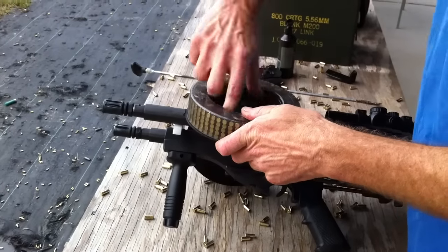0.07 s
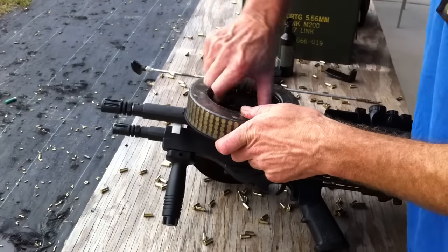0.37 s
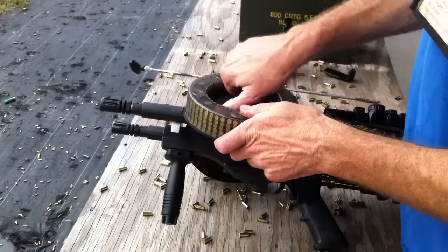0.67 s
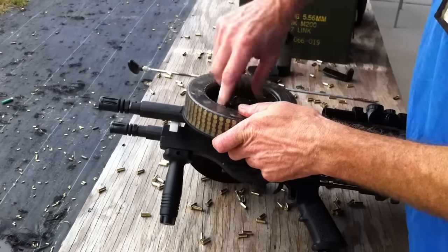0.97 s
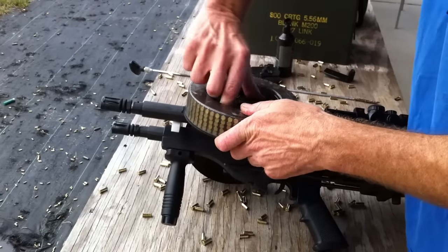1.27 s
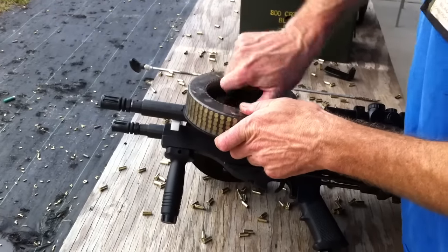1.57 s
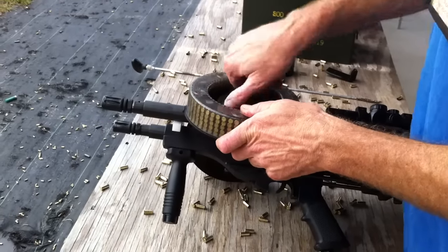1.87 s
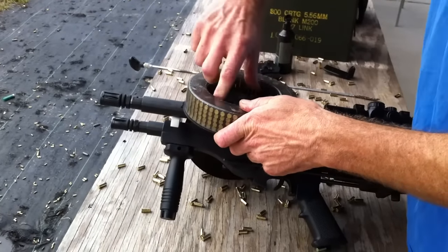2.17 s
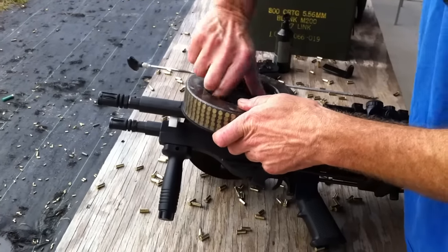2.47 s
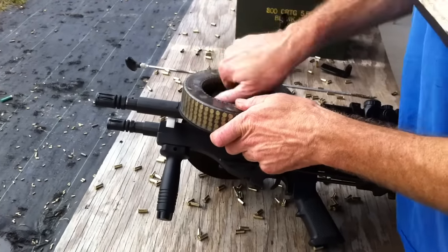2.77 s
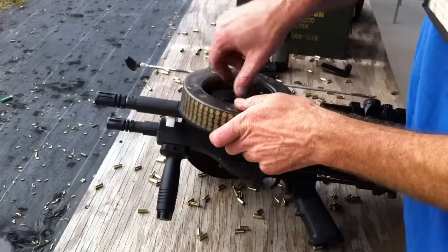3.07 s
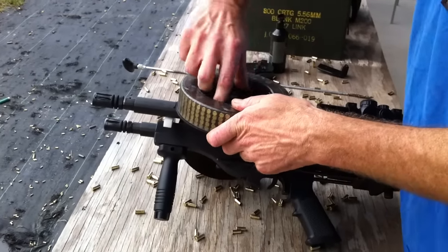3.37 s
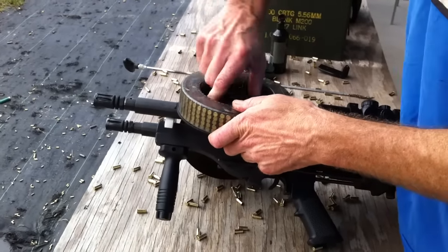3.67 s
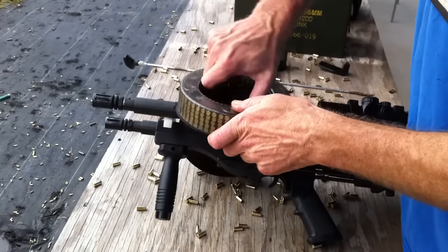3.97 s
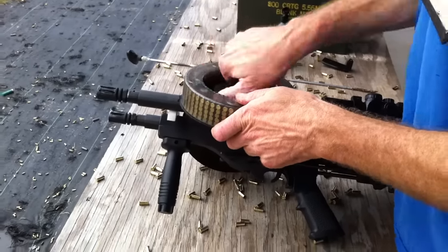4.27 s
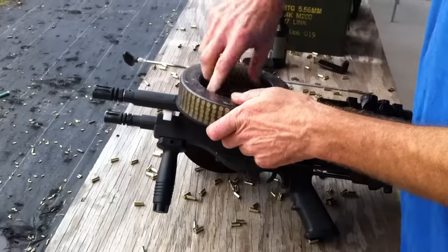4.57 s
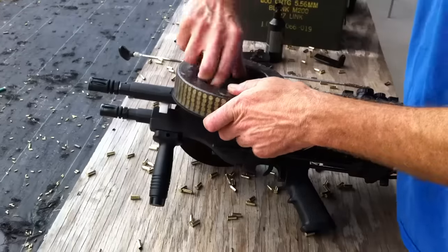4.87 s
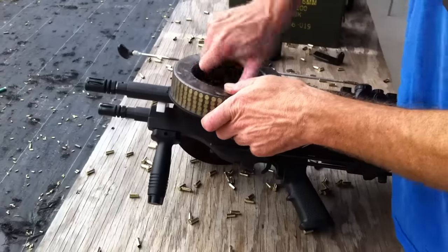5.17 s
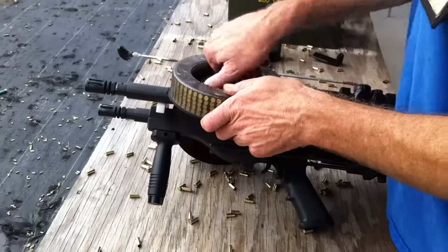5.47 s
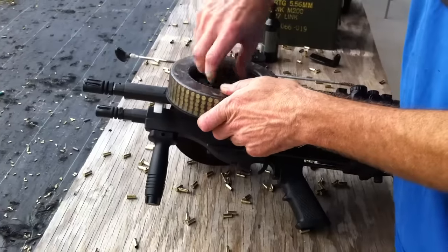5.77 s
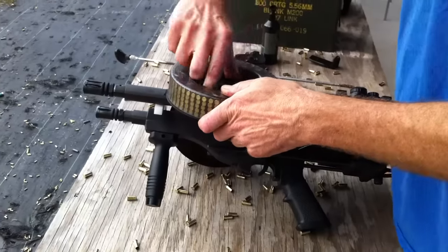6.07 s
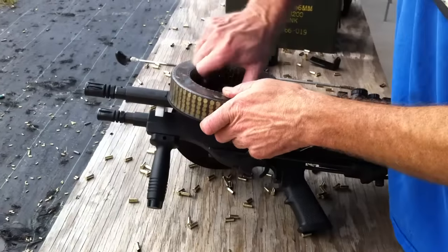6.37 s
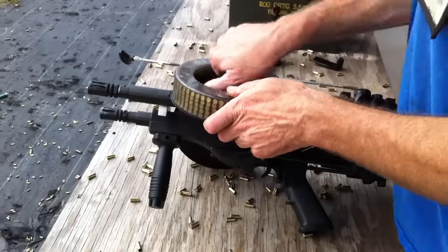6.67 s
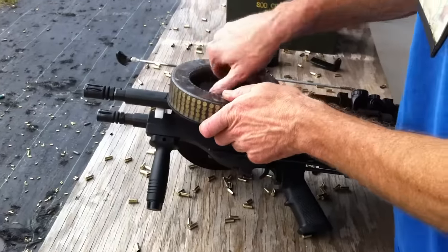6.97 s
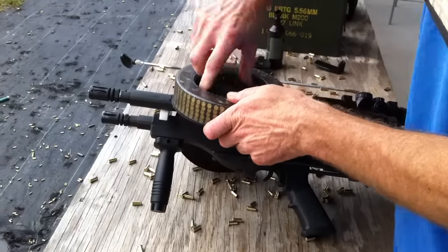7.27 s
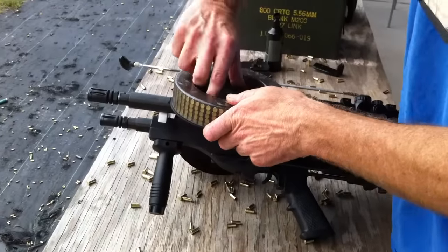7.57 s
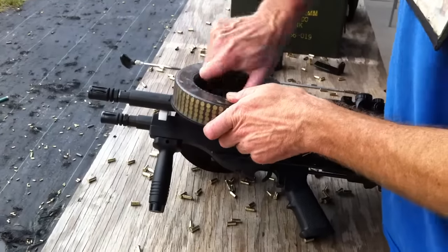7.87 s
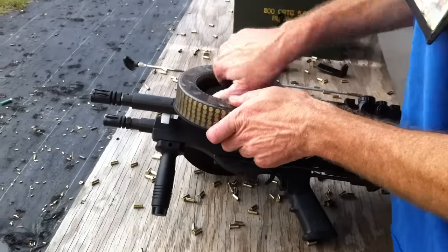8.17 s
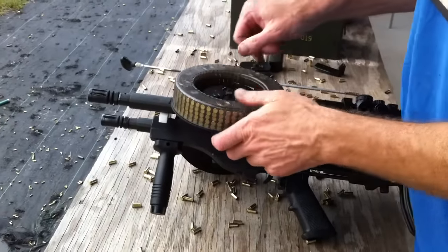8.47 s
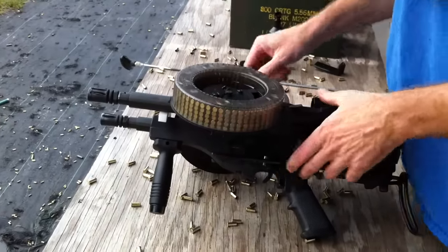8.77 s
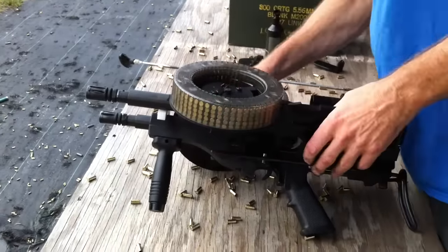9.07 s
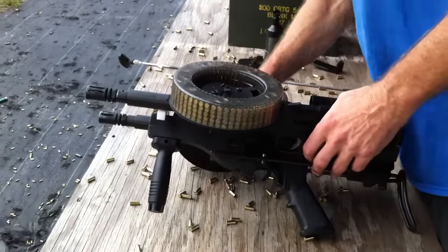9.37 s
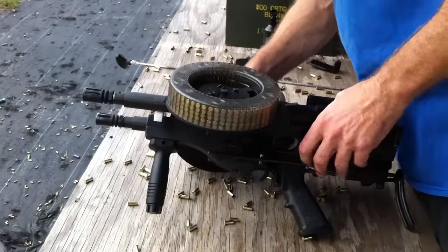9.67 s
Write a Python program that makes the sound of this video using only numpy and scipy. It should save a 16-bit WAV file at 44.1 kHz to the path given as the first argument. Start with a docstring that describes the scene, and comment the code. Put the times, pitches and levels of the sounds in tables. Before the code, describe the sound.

Close, sharp ratcheting comes in seven short runs as a hand winds a loaded drum magazine outdoors, with light finger ticks between.

```python
"""A few light finger ticks, then sharp ratchet snaps close to the microphone: on a wooden shooting bench, a
hand winds the spring of a drum magazine in seven twists. At each tooth the pawl snaps over and the loaded drum
rattles; after each twist the rotor falls back on the pawl with a heavier clack, and now and then the drum rocks
back on the bench with a low bump. Bench and shelter answer. The fingers tick, rub and bump nearby, over outdoor
rumble, the hum of a far machine and, near the end, two faint chirps of a far bird."""
import sys
import numpy as np
from scipy import signal
from scipy.fft import rfft, irfft, next_fast_len
from scipy.io import wavfile
from scipy.ndimage import uniform_filter1d

SR = 44100
rng = np.random.default_rng(int(sys.argv[2]) if len(sys.argv) > 2 else 0)


def waveform_to_disk(signal):
    """Save audio, clipped to [-1, 1], as 16-bit WAV at the path in sys.argv[1]."""
    frames = np.transpose(np.atleast_2d(signal))
    scaled = np.clip(frames, -1, 1) * 32767
    samples = np.round(scaled).astype(np.int16)
    wavfile.write(sys.argv[1], SR, samples)


N = 427756

# the pawl snaps over a tooth: (time [s], relative level [dB], rattle length [s])
PAWL_SNAPS = [(0.401, -13, 0.0037), (0.4768, -12, 0.0023), (.529, -11.5, 0.0051), (.581, -12.5, 0.006),
              (0.6553, -11, 0.0047), (1.383, -15.5, 0.0049), (1.482, -10, 0.0023), (1.5369, -12, 0.0012),
              (1.5982, -11.5, 0.0039), (1.6628, -12, 0.0043), (1.744, -12.5, 0.003), (1.8484, -14, 0.0019),
              (2.6007, -12, 0.0057), (2.674, -11, 0.0029), (2.718, -14, 0.0025), (2.778, -12.5, 0.0031),
              (2.834, -12.5, 0.0057), (2.8915, -13, 0.0043), (3.902, -10, 0.0034), (4.023, -10.5, 0.0031),
              (4.1053, -11, 0.003), (4.1713, -12, 0.0042), (4.2536, -11.5, 0.0012), (4.3223, -15, 0.0018),
              (5.17, -13, 0.0044), (5.228, -10.5, 0.001), (5.2846, -12.5, 0.0036), (5.3405, -12, 0.0044),
              (5.4068, -11.5, 0.0051), (5.4782, -14, 0.007), (6.377, -11, 0.0034), (6.4514, -12, 0.0045),
              (6.5156, -10.5, 0.0031), (6.5894, -13, 0.0048), (6.665, -12, 0.0047), (6.753, -12, 0.0043),
              (7.8112, -11.5, 0.0041), (7.8918, -10.5, 0.0021), (7.9515, -12, 0.0047),
              (8.028, -11.5, 0.0042), (8.1059, -10.5, 0.0051), (8.2015, -13.5, 0.0059)]
# the grip slackens, the rotor falls back: (time [s], relative level [dB], thud [dB], shell ring [dB])
ROTOR_CLACKS = [(0.7966, -15, -3, -3), (1.9316, -17.5, 13, 9.5), (3.0148, -16.5, 11, 2),
                (4.44, -25.5, 24, 14), (5.187, -11.5, 7, 10.5), (5.626, -16.5, 10.5, 6), (6.972, -9, 12, 8),
                (8.3084, -29.5, 16, 3)]
# the rotor slides; the grip sets how freely the shell rings:
# (start [s], end [s], sliding level [dB], shell ring [dB])
HAND_TWISTS = [(0.353, 0.683, -48.5, -2.5), (1.334, 1.85, -49.5, -1.5), (2.544, 2.891, -52, 0.5),
               (3.94, 4.334, -56, -1), (5.097, 5.475, -54.5, -0.5), (6.31, 6.76, -56.5, -1.5),
               (7.744, 8.202, -57, -3)]
# base spectrum of a contact, heard close: (frequency [Hz], level [dB])
CONTACT_SPECTRUM = [(60, -26), (170, -20.5), (330, -10.5), (480, -24), (720, -13.5), (880, -7.5),
                    (1050, -3.5), (1250, -1.5), (1500, -4.5), (1850, 0.5), (2800, -2.5), (4000, 1),
                    (7000, 0.5), (16000, -6)]
# resonances of pawl and rotor that colour every contact: (frequency [Hz], mean gain [dB])
ROTOR_RESONANCES = [(1220, 0.5), (1330, 3.5), (1850, -0.5), (2280, 2.5), (2730, 2.5), (3180, 2.5),
                    (3720, 3.5), (5600, 2), (8500, 0.5)]
# modes of drum shell and rotor: (frequency [Hz], level over the direct sound [dB], t60 [s])
SHELL_MODES = [(163, -2.5, 0.2), (313, -6.5, 0.19), (1046, -3, 0.055), (1090, -5, 0.072),
               (1200, -0.5, 0.02), (1357, -2, 0.07), (1650, -3, 0.0037), (1850, -11, 0.013),
               (2310, -15.5, 0.042), (2666, -8.5, 0.072), (3130, -15.5, 0.0067), (4050, -6, .015),
               (4500, -16, 0.069), (6600, -2, 0.02), (8630, -9.5, 0.025)]
# the fingers regrip and the slack is taken up: (time [s], relative level [dB])
FINGER_TICKS = [(0.118, -42.5), (.3336, -30), (0.3615, -23), (.872, -32.5), (1.1124, -40), (1.166, -40.5),
                (1.345, -29.5), (2.138, -45), (2.2483, -43), (2.52, -28.5), (2.5494, -24.5), (3.1023, -36),
                (3.395, -43), (3.633, -35.5), (3.774, -29.5), (4.7135, -32), (5.0689, -29.5), (5.121, -22),
                (5.964, -30.5), (6.2636, -25), (6.331, -27), (7.2945, -39.5), (7.3306, -41.5),
                (7.7064, -29), (9.302, -41), (9.4448, -41.5)]
# echo off the bench, just under the drum: (frequency [Hz], relative level [dB])
BENCH_SPECTRUM = [(100, -13), (300, -18.5), (500, 19), (1000, 0), (3000, 4), (7000, 0.5), (11000, 0.5),
                  (16000, -3.5)]
# echo from the shelter overhead: (frequency [Hz], relative level [dB])
SHELTER_SPECTRUM = [(100, -2), (500, 11.5), (1100, -1.5), (2000, -2.5), (4200, -3), (7500, -4.5),
                    (11000, -6.5), (16000, -11)]
# harder scrapes of the rotor: (middle [s], half length [s], level [dB])
ROTOR_SCRAPES = [(1.425, 0.0032, -42), (2.978, 0.0039, -45), (3.80, 0.024, -53), (5.135, .012, -45.5),
                 (6.963, 0.011, -44), (7.785, 0.027, -49)]
# friction of the sliding rotor: (frequency [Hz], relative level [dB])
FRICTION_SPECTRUM = [(200, -14), (700, -7), (1000, 5.5), (1250, 7.5), (1550, 0), (2500, 1.5), (3200, -6),
                     (5000, -9), (9000, -15), (16000, -20)]
# soft low bumps: hands and gun knock the bench, and after a release the drum rocks back on its low mode: #
# (middle [s], half length [s], level [dB], pitch [Hz])
BENCH_BUMPS = [(0.464, .017, -35.5, 179), (0.913, 0.012, -46.5, 139), (1.999, 0.014, -47, 322.7),
               (3.084, 0.026, -51, 310), (5.123, 0.018, -51.5, 322), (9.593, 0.035, -43.5, 181.6)]
# spectrum of a bump: (frequency [multiple of its pitch], relative level [dB])
BUMP_SPECTRUM = [(.15, -35.5), (.4, -11.5), (.7, -2.5), (1, 6), (1.3, -3.5), (1.9, -19.5), (4, -49),
                 (15, -70.5)]
# the hands brush drum and stock as they let go: (middle [s], half length [s], level [dB])
HAND_BRUSHES = [(8.62, 0.022, -50.5), (9.25, 0.058, -60)]
# spectrum of that brushing: (frequency [Hz], relative level [dB])
BRUSH_SPECTRUM = [(300, -11.5), (800, 2.5), (1200, 0.5), (1700, 7), (2500, -7), (3600, -4), (5000, -1.5),
                  (6500, -14), (10000, -16), (16000, -25.5)]
# open air around the shelter: (frequency [Hz], relative level [dB])
AIR_SPECTRUM = [(18, -82.5), (30, -37.5), (97, -12.5), (130, -1.5), (187, -1.5), (213, -6), (350, -6),
                (410, -12.5), (546, -10.5), (591, -7), (808, -16.5), (1050, -17), (1510, -23), (3880, -26),
                (15500, -31)]
# a far machine swells and fades: (time [s], level [dB])
HUM_LEVELS = [(0, -75.5), (2.0, -62.5), (2.6, -65), (4.5, -60), (5.7, -59), (8.1, -67.5), (8.5, -62),
              (9.0, -67.5), (9.7, -67.5)]
# a far bird: (middle [s], half length [s], level [dB])
BIRD_CHIRPS = [(8.517, 0.014, -69), (9.508, .014, -69.5)]

SNAP_THUD_DB, THUD_SPREAD_DB = 0.9, 0.5   # a snap is a light blow, never quite the same
THUD_LOSS_DB_PER_S = 950   # the longer it rattles, the less it thuds
FIRST_EDGE_DB, LAST_EDGE_DB, EDGE_SPREAD_DB = -1.5, 2, 0.84   # snaps grow sharper through each twist
CLACK_S, DULL_SHARE = 0.0019, 0.17   # a clack is brief; the more it rings, the duller its edge
BURSTS_DB, BURST_S = 2, 0.0005   # a rattle comes in uneven bursts
PEAK_WIDTH_OCTAVES, PEAK_SPREAD_DB = 0.052, 1.83   # each tooth excites the resonances differently
BODY_SPREAD_DB, BODY_STEP_OCTAVES = 1.1, 0.6   # the hand damps broad bands, differently at each contact
TICK_HOLLOW_FROM_DB, TICK_HOLLOW_SHARE = -41, 0.38
CATCHES_PER_S, CATCH_DB = 77, -4
AIR_DB, AIR_FALL_DB_PER_S = -57, 0.2344


def ratchet(snap_db, clack_db, lead_s):
    """Close up: a light snap for each tooth the pawl passes, a heavy clack when the rotor falls back."""
    out = np.zeros(N)
    for s, db, length_s in PAWL_SNAPS:
        start, end, _, ring_db = min(HAND_TWISTS, key=lambda twist: abs(s - (twist[0] + twist[1]) / 2))
        edge_db = np.interp(s, [start, end], [FIRST_EDGE_DB, LAST_EDGE_DB])
        edge_db += EDGE_SPREAD_DB * rng.standard_normal()
        thud_db = SNAP_THUD_DB - THUD_LOSS_DB_PER_S * length_s - THUD_SPREAD_DB * rng.standard_normal()
        colour_db = contact_colour(thud_db, ring_db, edge_db)
        add(out, s - lead_s, from_db(db + snap_db) * pawl_blow(length_s, colour_db, lead_s))
    for s, db, thud_db, ring_db in ROTOR_CLACKS:
        colour_db = contact_colour(thud_db, ring_db, edge_db=-DULL_SHARE * ring_db)
        add(out, s - lead_s, from_db(db + clack_db) * pawl_blow(CLACK_S, colour_db, lead_s))
    return out


def pawl_blow(length_s, colour_db, lead_s):
    """The pawl meets a tooth; the drum radiates differently toward microphone, bench and shelter."""
    direct, downward = [rattle(length_s, colour_db, lead_s, rise_s=0.00088, fall_s=0.0011, grain_db=2.0)
                        for _ in range(2)]
    # the shelter gathers all directions, so it receives the broad colour without the ripple
    smooth_click = irfft(causal(from_db(colour_db)))
    upward = np.concatenate([np.zeros(round(lead_s * SR)), smooth_click])[:len(direct)]
    return reflections(direct, downward, upward)


def rattle(length_s, colour_db, lead_s, rise_s, fall_s, grain_db):
    """The parts chatter in a dense cluster of tiny impacts."""
    size = 2 * len(colour_db) - 2
    t = np.arange(size) / SR - lead_s
    force = np.exp(np.minimum(t, 0) / rise_s - np.maximum(t - 0.88 * length_s, 0) / fall_s)
    bursts_db = BURSTS_DB * np.interp((t + lead_s) / BURST_S, np.arange(size), rng.standard_normal(size))
    chatter = force * rng.standard_normal(size)
    impacts = rfft(chatter * from_db(bursts_db + grain_db * rng.standard_normal(size)))
    # chance sets the fine ripple of the spectrum, the kind of contact its broad shape
    broad = np.sqrt(uniform_filter1d(np.abs(impacts) ** 2, size=64) + 1e-12)
    return irfft(impacts * causal(from_db(colour_db) / broad))


def contact_colour(thud_db, ring_db, edge_db, size=2048):
    """One contact's spectrum in dB: a heavy blow thuds and rings, a crisp one has edge."""
    hz = np.fft.rfftfreq(size, 1 / SR)
    thud = [(70, 0.5 * thud_db), (200, thud_db), (330, 0.82 * thud_db)]
    ring = [(750, 0.65 * ring_db), (1150, ring_db), (1350, 0.82 * ring_db)]
    edge = [(1900, 0.0018), (5500, 0.0053), (10000, edge_db)]
    colour_db = at_hz(CONTACT_SPECTRUM, hz) + at_hz(thud + ring + edge, hz)
    for peak_hz, db in ROTOR_RESONANCES:
        peak = np.exp(-0.5 * (np.log2((hz + 1) / peak_hz) / PEAK_WIDTH_OCTAVES) ** 2)
        colour_db += (db + PEAK_SPREAD_DB * rng.standard_normal()) * peak
    grip_db = BODY_SPREAD_DB * rng.standard_normal(size=64)
    return colour_db + np.interp(np.log2(hz + 1) / BODY_STEP_OCTAVES, np.arange(len(grip_db)), grip_db)


def drum_shell(blows):
    """The shell passes each blow on and rings briefly in its modes."""
    out = blows.copy()
    for hz, db, t60 in SHELL_MODES:
        radius = np.exp(-np.log(1000) / (t60 * SR))
        feedforward = np.array([1, 0, -1]) * (1 - radius ** 2) / 2
        feedback = [1, -2 * radius * np.cos(2 * np.pi * hz / SR), radius ** 2]
        out += from_db(db) * signal.lfilter(feedforward, feedback, blows + 1e-18)
    return out


def finger_ticks(tick_db, lead_s):
    """Single light contacts; the firmer ones reach the shell and sound hollow."""
    out = np.zeros(N)
    for s, db in FINGER_TICKS:
        hollow_db = TICK_HOLLOW_SHARE * (db - TICK_HOLLOW_FROM_DB)
        colour_db = contact_colour(thud_db=2 * hollow_db, ring_db=hollow_db, edge_db=1)
        tick = rattle(0.0018, colour_db, lead_s, rise_s=0.00033, fall_s=0.0015, grain_db=0)
        add(out, s, from_db(db + tick_db) * reflections(tick, tick, tick))
    return out


def rotor_rubbing(rough_db, size=2048):
    """The rotor sticks and slips under each twist, catching on the spring and the cartridges."""
    t = np.arange(N) / SR
    sliding = sum(from_db(db) * ((t > start) & (t < end)) for start, end, db, _ in HAND_TWISTS)
    pressure = uniform_filter1d(sliding, size=1000) + swells(ROTOR_SCRAPES)
    friction = from_db(rough_db * drift(rate_hz=250)) * coloured_noise(FRICTION_SPECTRUM)
    impulses = (rng.random(N) < CATCHES_PER_S / SR) * rng.standard_normal(N)
    catch_gain = from_db(at_hz(FRICTION_SPECTRUM, np.fft.rfftfreq(size, 1 / SR)))
    catches = signal.oaconvolve(impulses, irfft(causal(catch_gain)))[:N]
    return pressure * (friction + from_db(CATCH_DB) * rms_one(catches))


def bench_bumps(size=16384):
    """Soft low bumps of hands, gun and the rocking drum on the bench: short swells of low noise, each around
    its pitch."""
    out = np.zeros(N)
    t = (np.arange(size) - size // 2) / SR
    for s, half_s, db, pitch_hz in BENCH_BUMPS:
        rumble = coloured_noise(np.array(BUMP_SPECTRUM) * [pitch_hz, 1], size=size)
        add(out, s + t[0], from_db(db) * np.exp(-0.5 * (t / half_s) ** 2) * rumble)
    return out


def hand_brushes():
    """The hands slide off drum and stock with a soft hiss."""
    return swells(HAND_BRUSHES) * coloured_noise(BRUSH_SPECTRUM)


def reflections(direct, downward, upward):
    """At the microphone: the direct click, then the bench, the shelter and a faint far tail."""
    bench = from_db(-10.5) * echoes(BENCH_SPECTRUM, delay_s=0.0056, t60=0.028, grain_db=0.5, size=2048)
    shelter = from_db(-16.5) * echoes(SHELTER_SPECTRUM, delay_s=0.014, t60=0.17, grain_db=3.5)
    far = from_db(-32) * echoes(SHELTER_SPECTRUM, delay_s=0.03, t60=0.58, grain_db=2.5)
    heard = signal.fftconvolve(upward, shelter + far)
    add(heard, 0, signal.fftconvolve(downward, bench))
    add(heard, 0, direct)
    return heard


def echoes(spectrum, delay_s, t60, grain_db, size=12000):
    """Dying echoes of unit energy; the turning rotor and moving hand scatter each click differently."""
    t = np.arange(size) / SR - delay_s
    surfaces = np.repeat(from_db(grain_db * rng.standard_normal(size)), 32)[:size]
    decay = (t > 0) * np.exp(-np.log(1000) * np.maximum(t, 0) / t60)
    tail = coloured_noise(spectrum, size=size) * surfaces * decay
    return tail / np.sqrt(np.sum(tail ** 2))


def open_air():
    """Nearly steady rumble and hiss from all around the shelter."""
    t = np.arange(N) / SR
    return from_db(AIR_DB - AIR_FALL_DB_PER_S * t) * coloured_noise(AIR_SPECTRUM)


def far_machine(pitch_hz, waver_hz):
    """A machine in the distance hums on one slightly wavering tone."""
    level_db = np.interp(np.arange(N) / SR, *np.transpose(HUM_LEVELS))
    phase = 2 * np.pi * np.cumsum(pitch_hz + waver_hz * drift(rate_hz=8)) / SR
    return np.sqrt(2) * from_db(level_db) * np.sin(phase)


def far_bird(pitch_hz, glide_hz):
    """Thin, slightly rising notes, well away from the microphone."""
    out = np.zeros(N)
    t = np.arange(N) / SR
    for s, half_s, db in BIRD_CHIRPS:
        hz = pitch_hz + glide_hz * np.tanh((t - s) / half_s)
        out += swells([(s, half_s, db)]) * np.sqrt(2) * np.sin(2 * np.pi * np.cumsum(hz) / SR)
    return out


def swells(rows):
    """A bell-shaped rise and fall for each row."""
    t = np.arange(N) / SR
    return sum(from_db(db) * np.exp(-0.5 * np.minimum(((t - s) / half_s) ** 2, 100))
               for s, half_s, db in rows)


def coloured_noise(spectrum, size=N):
    """Noise of a given spectrum, rms 1."""
    padded = next_fast_len(size, real=True)
    gain = from_db(at_hz(spectrum, np.fft.rfftfreq(padded, 1 / SR)))
    return rms_one(irfft(rfft(rng.standard_normal(padded)) * gain, padded)[:size])


def drift(rate_hz):
    """A random wander: values of spread 1, joined by straight lines."""
    knots = rng.standard_normal(4000)
    return np.interp(np.arange(N) / SR * rate_hz, np.arange(len(knots)), knots)


def causal(gain):
    """The minimum-phase response with these gains: nothing sounds before the blow."""
    cepstrum = irfft(np.log(gain + 1e-9))
    half = len(cepstrum) // 2
    cepstrum[1:half] *= 2
    cepstrum[half + 1:] = 0
    return np.exp(rfft(cepstrum))


def at_hz(spectrum, hz):
    """A spectrum in dB, joined on a log-frequency axis."""
    knots, db = np.transpose(spectrum)
    return np.interp(np.log(hz + 1), np.log(knots), db)


def add(track, s, sound):
    """Mix a sound in at time s."""
    start = max(round(s * SR), 0)
    track[start:start + len(sound)] += sound[:max(N - start, 0)]


def from_db(db):
    return 10 ** (np.asarray(db) / 20)


def rms_one(x):
    return x / np.sqrt(np.mean(x ** 2) + 1e-20)


def scene():
    """One microphone at the bench: drum and hands close, the outdoors behind."""
    blows = ratchet(snap_db=23.0, clack_db=22.5, lead_s=0.004)
    ticks = finger_ticks(tick_db=10.5, lead_s=0.00084)
    hands = rotor_rubbing(rough_db=3.0) + bench_bumps() + hand_brushes()
    outdoors = open_air() + far_machine(pitch_hz=598, waver_hz=1.5)
    bird = far_bird(pitch_hz=3167, glide_hz=70.4)
    return (drum_shell(blows + ticks) + hands + outdoors + bird)[None]


def record(dry):
    """After the microphone, the highest peaks are rounded and the top treble is cut."""
    ceiling, cutoff_hz = 0.88, 16000
    rounded = dry / (1 + (dry / ceiling) ** 4) ** 0.25
    return signal.sosfilt(signal.ellip(10, 0.2, 70, cutoff_hz, fs=SR, output="sos"), rounded)


dry = scene()
out = record(dry)
waveform_to_disk(out)
```